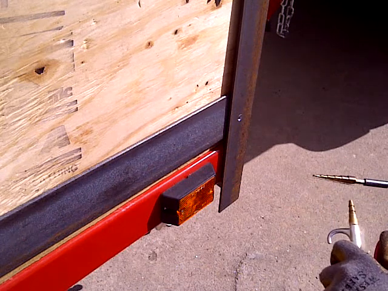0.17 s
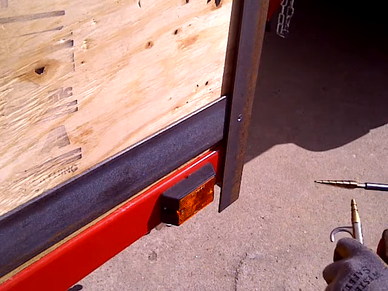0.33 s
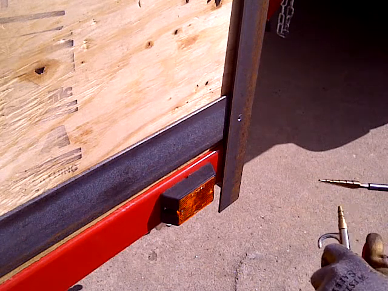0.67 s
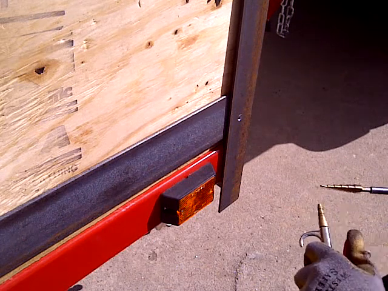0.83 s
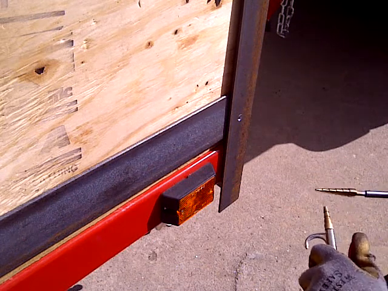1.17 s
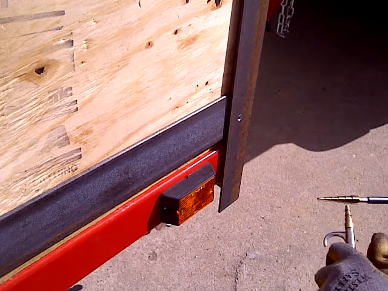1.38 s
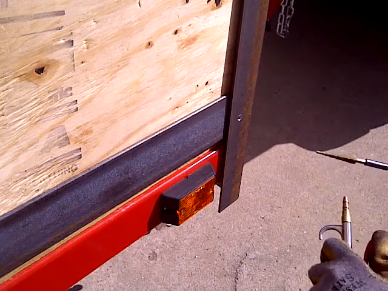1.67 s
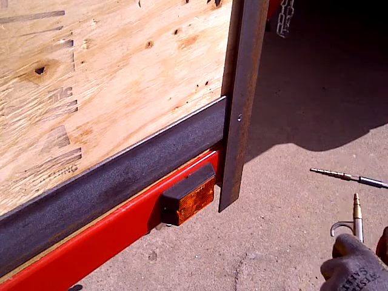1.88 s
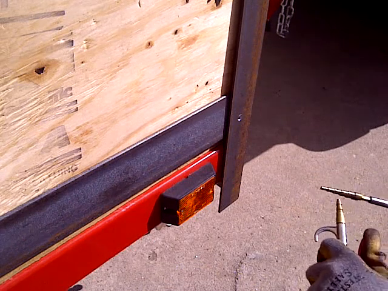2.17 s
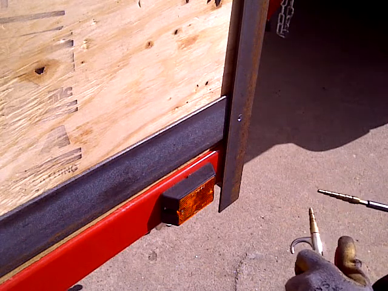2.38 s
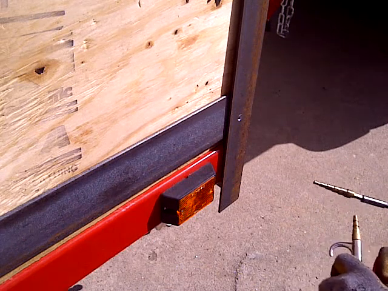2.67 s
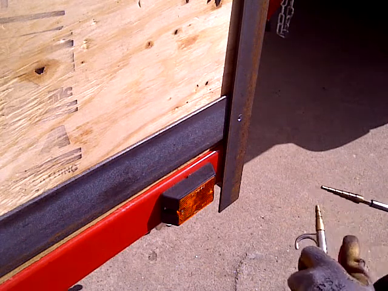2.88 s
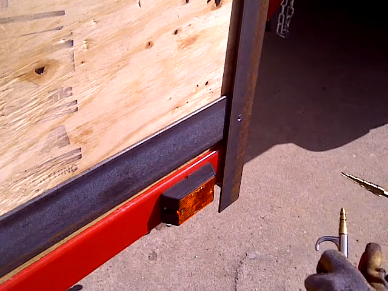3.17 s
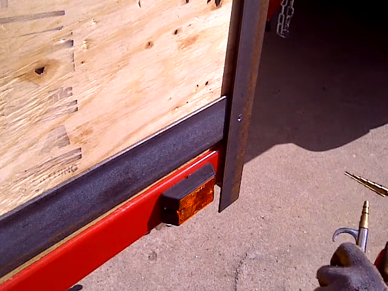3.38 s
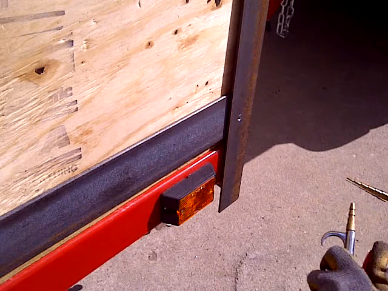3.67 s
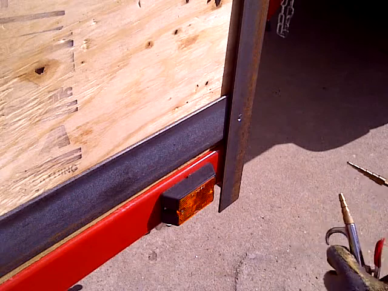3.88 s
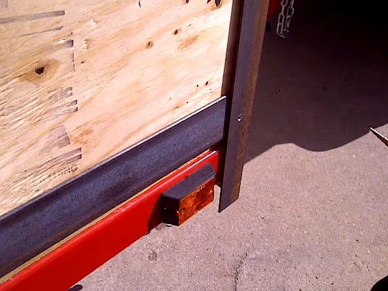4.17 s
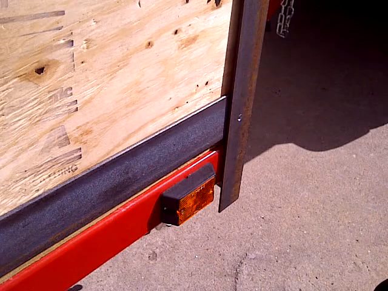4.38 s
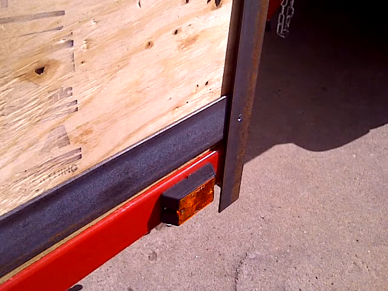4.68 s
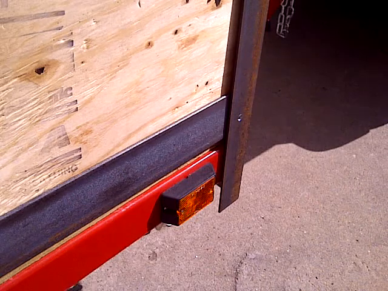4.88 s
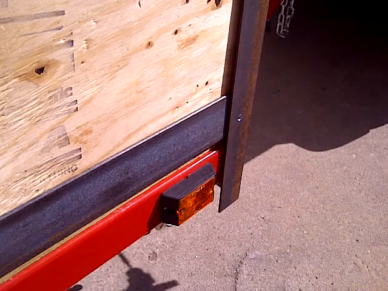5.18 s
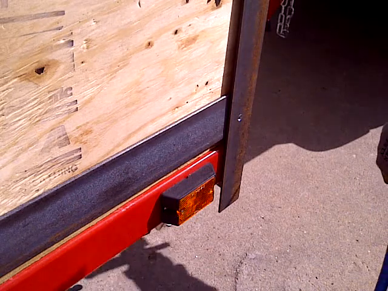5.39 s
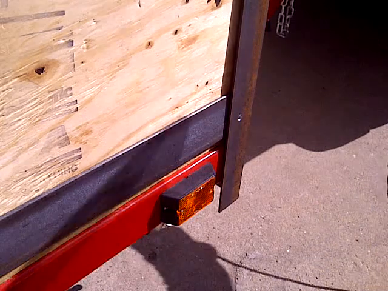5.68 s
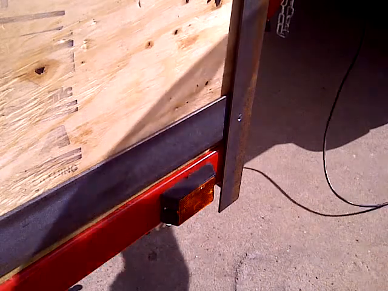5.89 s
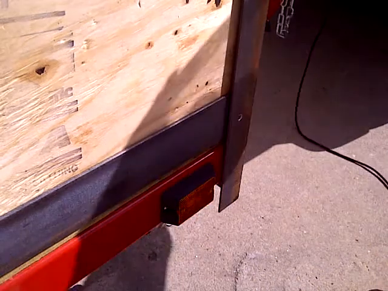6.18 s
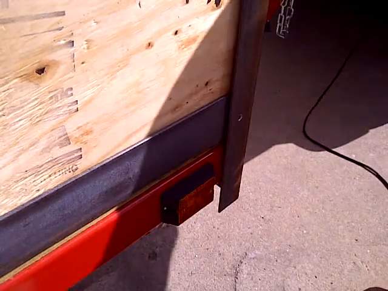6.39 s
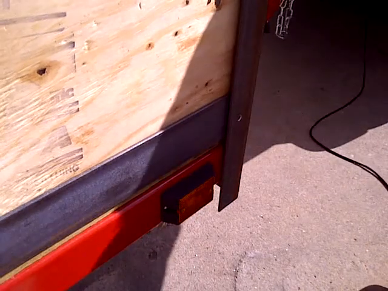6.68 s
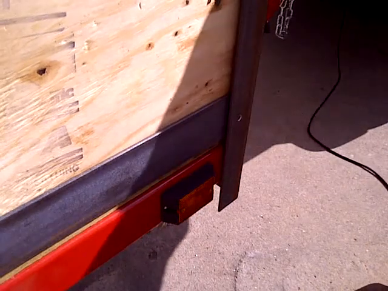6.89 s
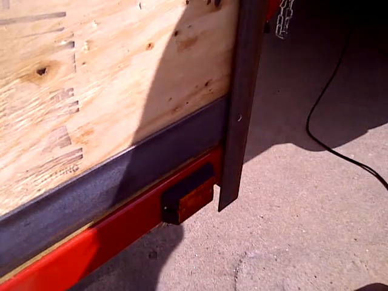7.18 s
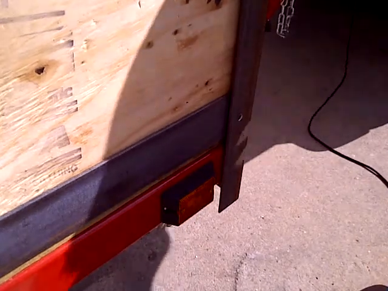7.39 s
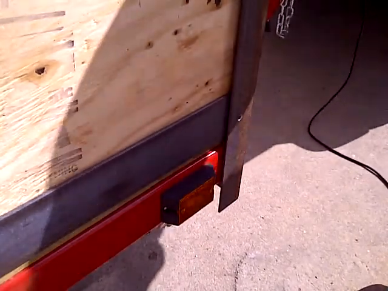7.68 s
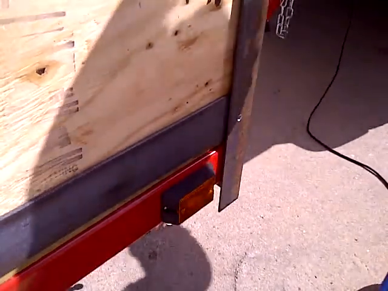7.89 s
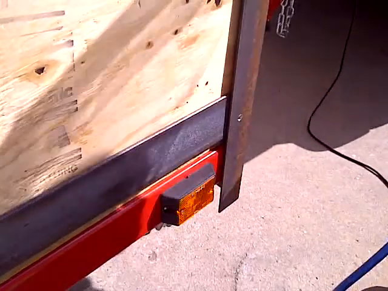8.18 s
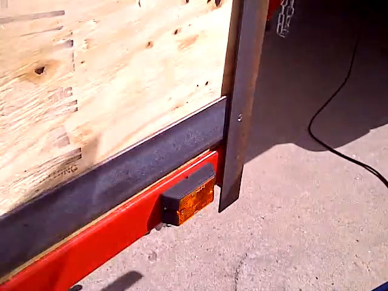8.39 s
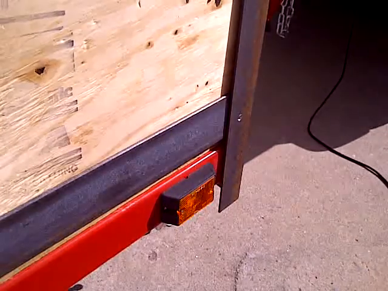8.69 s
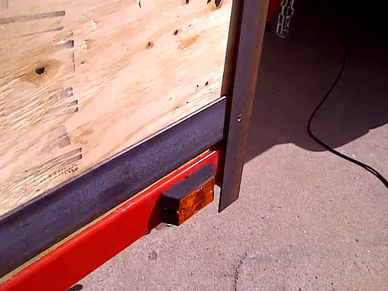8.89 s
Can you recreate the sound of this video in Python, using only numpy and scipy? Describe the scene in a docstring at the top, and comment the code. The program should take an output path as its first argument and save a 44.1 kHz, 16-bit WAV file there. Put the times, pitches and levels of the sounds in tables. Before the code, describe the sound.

A small machine hums steadily in a workshop for the whole nine seconds, a pitched drone with a rush of air and a faint whine that swells and fades. At about 0.4 seconds a handheld blow gun opens with a soft hiss of compressed air. The jet flares into louder, breathy, faintly whistling spurts with a low flutter each time it crosses a metal tip, strongest around 0.8 seconds, and shuts off at 1.6. A second blast runs from about 2.2 to 3.9 seconds, flaring repeatedly until 2.9 and again from 3.5, ending with a brief whistling spit. The hum then continues alone. Between about 6 and 7 seconds someone shuffles a few steps on concrete, soft thuds with short scrapes of the soles. One more step lands near 8 seconds, and the machine drones on to the end.

```python
"""In a workshop with a concrete floor, a blow gun is opened twice and swept across a metal tip.
Its turbulent jet hisses softly in free air and flares up each time it meets the metal, where
the edge adds a breathy tone and sheds large, low-pitched eddies. A small machine drones nearby
on the harmonics of its shaft rotation, over a rush of air. Later someone shuffles a few steps,
each a thud of impact with a scrape of friction."""
import sys
import numpy as np
from scipy import signal
from scipy.fft import rfft, irfft
from scipy.io import wavfile
from scipy.ndimage import uniform_filter1d, map_coordinates

SR = 44100
rng = np.random.default_rng(int(sys.argv[2]) if len(sys.argv) > 2 else 0)


def digitize_waveform(pressure):
    """Quantize a signal to 16-bit integers and store it at the path in sys.argv[1].

    Rows of a 2-D input are taken as channels; values are limited to [-1, 1].
    """
    field = np.atleast_2d(pressure).T
    bounded = np.clip(field, -1, 1)
    quanta = np.round(bounded * 32767).astype(np.int16)
    wavfile.write(sys.argv[1], SR, quanta)


N = 398663
TIME = np.arange(N) / SR

# Trigger squeezes: leak t/s, opening t/s, shutting t/s, initial free-jet level/dB
SQUEEZES = [(0.434, 0.497, 1.571, -35.5), (2.157, 2.193, 3.88, -36.5)]
# Spectrum of the large eddies shed by the metal: f/Hz, relative level/dB
BUFFET_SPECTRUM = [(50, -30.5), (170, -1), (300, -1), (600, -2), (900, 3.5), (1200, -17.5), (2500, -61)]
def blow_gun(leak=0.57, open_s=.008, shut_s=0.012, flutter_db=.5, buffet_growth=1.22, pivot_db=-24):
    """Valve-gated flow: a leak, then the full jet, whose hiss and buffeting flutter together."""
    valve = sum(np.interp(TIME, [leaks, opens, opens + open_s, shuts - shut_s, shuts],
                          [0, leak, 1, 1, 0]) for leaks, opens, shuts, _ in SQUEEZES)
    strength_db = jet_sweep(TIME)[0]
    buffet_db = pivot_db + buffet_growth * (strength_db - pivot_db) - 15  # grows faster than the hiss
    buffet = noise(lambda hz: level_at(BUFFET_SPECTRUM, hz)) * amp(buffet_db)
    return valve * (jet_hiss() + buffet) * amp(flutter_db * drift(45))


# Spectrum of the jet in free air: f/Hz, relative level/dB
FREE_SPECTRUM = [(560, -32.5), (950, -11), (1030, -3), (1300, -2.5), (1420, -3), (1750, -0.5), (2420, -4),
                 (2890, 0), (3740, 2.5), (6420, -13), (7360, -24.5), (9570, -44.5), (16200, -120)]
# Spectrum of the jet on the metal: f/Hz, relative level/dB
EDGE_SPECTRUM = [(560, -49.5), (950, -12), (1010, -12.5), (1160, -0.5), (1410, -6), (1690, -1.5),
                 (1970, -8.5), (2110, -10.5), (2750, -1.5), (3460, -1), (4180, -1.5), (4560, -5),
                 (5940, -4.5), (6810, -12), (7360, -19.5), (9570, -44), (16200, -120)]
def jet_hiss(free_db=-37, edge_db=-29, eddy_db=2.06, echo=0.28, echo_s=.0028, tone_width_hz=560):
    """Turbulent noise: the spectrum passes from free jet to edge noise as the strength rises."""
    hz, t, white = signal.stft(rng.standard_normal(N), SR, nperseg=512, noverlap=384)
    strength_db, body_db, sizzle_db, tone_hz, tone_db = (c[:, None] for c in jet_sweep(t))
    contact = np.clip((strength_db - free_db) / (edge_db - free_db), 0, 1)
    colour = amp((1 - contact) * level_at(FREE_SPECTRUM, hz) + contact * level_at(EDGE_SPECTRUM, hz))
    colour *= amp(tone_db * resonance(hz, tone_hz, tone_width_hz))
    eddies = uniform_filter1d(rng.standard_normal(colour.shape), size=16, axis=0)  # smooth in time
    eddies = unit(uniform_filter1d(eddies, size=4, axis=1))  # and in frequency
    colour *= amp(eddy_db * eddies * (1 + contact) / 2)
    # The floor reflection interferes with the direct sound: a swaying comb filter.
    delay_s = echo_s * (1 + .12 * np.interp(t, TIME, drift(1.5)))[:, None]
    colour *= abs(1 + echo * np.exp(-2j * np.pi * hz * delay_s))
    # The aim of the nozzle sets the balance of three bands.
    bands_hz = [(1000, 2200), (2500, 4800), (5400, 7400)]  # body, core, sizzle
    balance_db = 0
    for (low, high), target_db, share in zip(bands_hz, (body_db, 0, sizzle_db), np.eye(3)):
        power = (colour[:, (hz > low) & (hz < high)] ** 2).sum(1, keepdims=True) / len(hz)
        crossfade = np.interp(hz, np.mean(bands_hz, axis=1), share)
        balance_db = balance_db + (target_db - 10 * np.log10(power)) * crossfade
    gain = colour * amp(strength_db + balance_db)
    return signal.istft(white * gain.T, SR, nperseg=512, noverlap=384)[1][:N]


# Passes over the metal: meeting t/s, leaving t/s, meeting level/dB, leaving level/dB,
# body level/dB and sizzle level/dB (both re core), edge tone f/Hz, tone gain/dB
METAL_PASSES = [(0.515, 0.715, -28.5, -23, -5.5, -7, 4160, 0),
                (0.757, 0.829, -21, -21.5, -5, -8.5, 3400, -2), (1.0, 1.04, -34.5, -36, -6, 2, 3500, -1),
                (1.076, 1.128, -29.5, -29.5, -3, -5, 3500, 1),
                (1.18, 1.295, -28.5, -28, -6.5, -4.5, 3880, -2), (1.47, 1.557, -36, -37, -12, -8, 3390, 3),
                (2.205, 2.298, -38.5, -29.5, -5.5, -8, 3680, -2),
                (2.334, 2.407, -27, -29, -3.5, -5.5, 3500, 1), (2.46, 2.58, -42, -40, 3, -7, 3500, 0),
                (2.646, 2.75, -29.5, -27, -4.5, -5, 3230, 6), (2.794, 2.897, -29, -25, -4, -6, 3360, 1),
                (3.505, 3.613, -28.5, -27.5, -4, -7.5, 3680, -2),
                (3.658, 3.78, -28, -28.5, -2, -6.5, 3040, 5.5)]
def jet_sweep(t, meet_s=.012, leave_s=0.017, sag_db_per_s=1.5):
    """Incoherent addition: free jet and passes sum in power, giving a level and a weighted timbre."""
    leaks, opens, _, level_db = np.transpose(SQUEEZES)
    squeeze = np.maximum(np.searchsorted(leaks, t) - 1, 0)
    sag_db = sag_db_per_s * np.maximum(t - opens[squeeze], 0)  # the hose loses pressure
    powers = [amp(level_db[squeeze] - sag_db) ** 2]
    timbres = [(-2.5, -8.5, 3500, 0)]  # free jet: body/dB, sizzle/dB, tone f/Hz, tone gain/dB
    for meets, leaves, first_db, last_db, *timbre in METAL_PASSES:
        on_metal = smooth_step((t - meets) / meet_s) * smooth_step((leaves - t) / leave_s)
        powers.append((on_metal * amp(np.interp(t, [meets, leaves], [first_db, last_db]))) ** 2)
        timbres.append(timbre)
    total = np.sum(powers, axis=0)
    return 10 * np.log10(total), *(np.transpose(timbres) @ np.array(powers) / total)


# Brief flares of the jet: t/s, level/dB, Gaussian width/s, edge tone f/Hz, tone gain/dB
FLARES = [(0.8, -32, .012, 3300, 4), (1.077, -27, 0.015, 3700, 9), (1.285, -26, .008, 3900, 11),
          (1.549, -29, 0.0061, 3680, 8), (2.207, -33, .005, 3600, 6), (2.332, -37, .011, 3180, 4),
          (2.649, -26.5, 0.01, 3370, -3), (2.723, -23, 0.0072, 3280, 6), (2.887, -32, .014, 3420, 6),
          (3.552, -24, 0.0088, 3100, 6), (3.872, -30, 0.0053, 3450, 19)]
def spits(width_hz=550):
    """Edge tone: the jet clips an edge or the closing valve and gives a breathy burst."""
    out = np.zeros(N)
    for s, db, width_s, tone_hz, tone_db in FLARES:
        flare = noise(lambda hz: level_at(EDGE_SPECTRUM, hz) + tone_db * resonance(hz, tone_hz, width_hz))
        out += amp(db) * gaussian(s, width_s) * flare
    return out


# Strong shaft harmonics: order, level/dB
STRONG_ORDERS = [(2, -45), (5, -47.5), (6, -51), (7, -46), (8, -38), (9, -44.5), (10, -39.0), (11, -48.5),
                 (12, -53), (13, -52), (14, -63), (15, -41.5), (16, -52), (17, -55.5), (18, -57), (22, -56),
                 (23, -61.5), (24, -58), (26, -58.5), (29, -57.0), (31, -53.5), (32, -51.5), (35, -57.5),
                 (38, -59), (45, -61), (46, -59.5), (52, -54.5), (57, -59)]
# Spectral envelope of the remaining harmonics: f/Hz, level/dB
WEAK_ENVELOPE = [(56, -70.5), (170, -61.5), (226, -64.5), (1100, -65.5), (2000, -67.5), (3200, -64),
                 (3700, -74.5), (4600, -73), (5300, -80), (6500, -93)]
# Swell and fade of the whining harmonic: t/s, gain/dB
WHINE_SWELL = [(0, 3.5), (3, 2.5), (4, -2), (5, 0.5), (6.3, 5.5), (7.3, 2), (8.2, -5.5), (9.04, -6)]
def machine_hum(turns, shaft_hz, whine_order=32, scatter_db=2, smear_turns=.17, rattle=.18):
    """Harmonic series: one pulse a turn, smeared by the housing; high orders rattle and fade."""
    strong = {round(k): db for k, db in STRONG_ORDERS}
    out = np.zeros(N)
    for k in range(1, 95):
        hz = k * shaft_hz
        diffuse = np.interp(hz, [600, 1500], [0, 1])  # short waves arrive by many paths
        db = strong.get(k, level_at(WEAK_ENVELOPE, hz) + diffuse * scatter_db * rng.standard_normal())
        if k == whine_order:
            fading_db = np.interp(TIME, *np.transpose(WHINE_SWELL))
        else:
            fading_db = (0.4 + 2.2 * diffuse) * drift(0.463)
        lag = smear_turns * k ** 2 / 2 + diffuse * rng.standard_normal()  # higher orders come later
        shake = 1 + rattle * diffuse * drift(12)
        out += amp(db + fading_db) * shake * np.cos(2 * np.pi * (k * turns - lag))
    return np.sqrt(2) * out


# Spectrum of the machine's air noise: f/Hz, relative level/dB
RUSH_SPECTRUM = [(20, -9.5), (60, -7.5), (110, -2), (250, -4), (480, 3), (900, -2), (1200, -7.5),
                 (2000, -10.5), (3000, -9), (3800, -14), (5200, -18.5), (5700, -19.5), (6700, -25.5),
                 (7400, -43)]
# Housing resonances: f/Hz, bandwidth/Hz, gain/dB
HOUSING_MODES = [(2900, 250, 2.5), (4480, 81, 9), (4660, 78, 8.5), (5130, 55, 10.5), (5290, 110, 8.5)]
def machine(shaft_hz=56.6, jitter_turns=.0014, throb_depth=0.088, flicker_db=0.9, rush_db=-43.0):
    """Rotational noise: hum, plus rushing air that excites the housing and throbs twice a turn."""
    turns = shaft_hz * TIME + jitter_turns * drift(22)
    hum = machine_hum(turns, shaft_hz)
    rush = noise(lambda hz: level_at(RUSH_SPECTRUM, hz)
                 + sum(db * resonance(hz, centre, width) for centre, width, db in HOUSING_MODES))
    throb = 1 + throb_depth * np.cos(2 * np.pi * 2 * turns)
    return hum + amp(rush_db + flicker_db * drift(7.1)) * rush * throb


# Shoes on concrete: t/s, thud level/dB, scrape level/dB, Gaussian width/s
FOOTFALLS = [(5.95, -51, -64, .03), (6.435, -59, -35, 0.015), (6.486, -47, -60, 0.027),
             (6.602, -50, -48, 0.036), (6.69, -51, -60, 0.04), (6.835, -53, -38.5, 0.016),
             (6.87, -44.5, -44, 0.032), (7.91, -45.5, -50, 0.018), (7.98, -57, -63, .03)]
# Spectrum of the impact: f/Hz, relative level/dB
THUD_SPECTRUM = [(50, -19), (110, -1), (180, 3), (280, -6), (500, -23), (1200, -49)]
# Spectrum of the sliding sole: f/Hz, relative level/dB
SCRAPE_SPECTRUM = [(120, -16), (280, 0.5), (700, 4), (1500, -2), (2100, -10), (4000, -38), (7000, -56)]
def footsteps():
    """Impact and friction: each step is a soft thud with some scrape of the sole."""
    thud = noise(lambda hz: level_at(THUD_SPECTRUM, hz))
    scrape = noise(lambda hz: level_at(SCRAPE_SPECTRUM, hz))
    return sum(gaussian(s, width_s) * (amp(thud_db) * thud + amp(scrape_db) * scrape)
               for s, thud_db, scrape_db, width_s in FOOTFALLS)


def amp(db):
    """Amplitude ratio of a level in decibels."""
    return 10 ** (np.asarray(db) / 20)


def unit(x):
    """Normalisation to rms 1."""
    return x / np.sqrt(np.mean(x ** 2) + 1e-20)


def level_at(spectrum, hz):
    """Interpolation of a spectrum on a log-frequency axis."""
    f, db = np.transpose(spectrum)
    return np.interp(np.log(hz + 1), np.log(f + 1), db)


def noise(spectrum_db):
    """Spectral shaping: white noise filtered by a function of frequency, at rms 1."""
    gain = amp(spectrum_db(np.fft.rfftfreq(N, 1 / SR)))
    return unit(irfft(rfft(rng.standard_normal(N)) * gain, N))


def drift(rate_hz):
    """Random modulation: a smooth wander of rms about 1."""
    knots = rng.standard_normal(4096)
    coarse = TIME[::64]
    return np.interp(TIME, coarse, map_coordinates(knots, [coarse * rate_hz * 2], order=3, mode="wrap"))


def gaussian(centre_s, width_s):
    """Gaussian envelope of height 1."""
    return np.exp(-np.minimum(((TIME - centre_s) / width_s) ** 2 / 2, 50))


def resonance(hz, centre, width):
    """Lorentzian resonance curve of height 1."""
    return 1 / (1 + (2 * (hz - centre) / width) ** 2)


def smooth_step(x):
    """Logistic rise from 0 to 1, nearly complete at x = 0."""
    return (1 + np.tanh(x / 2 + 1)) / 2


def scene():
    """Superposition: all sources add at one point."""
    return (blow_gun() + spits() + machine() + footsteps())[None]


def record(dry, cutoff_hz=7520):
    """Band limiting: a steep low-pass filter removes the top treble."""
    low_pass = signal.firwin(301, cutoff_hz, window=("kaiser", 8), fs=SR)
    return signal.oaconvolve(dry, low_pass[None], "same")


dry = scene()
out = record(dry)
digitize_waveform(out)
```